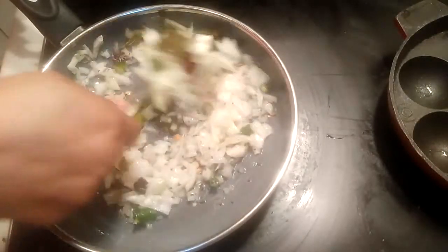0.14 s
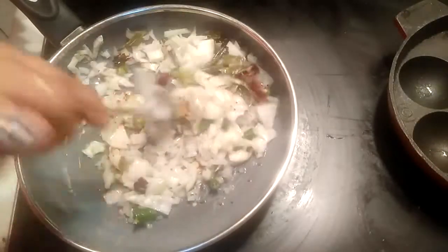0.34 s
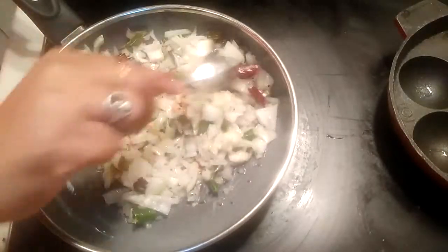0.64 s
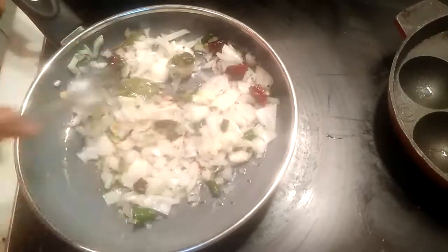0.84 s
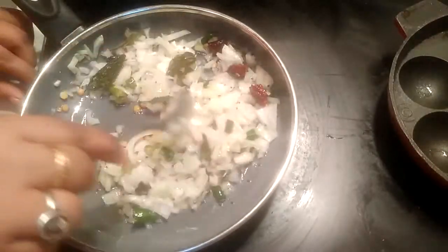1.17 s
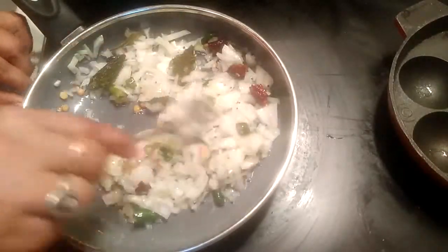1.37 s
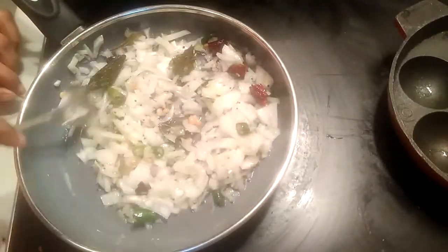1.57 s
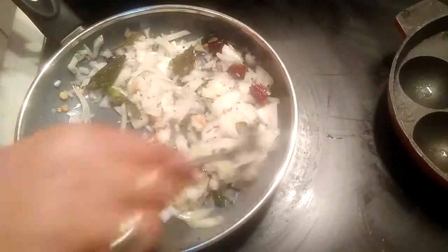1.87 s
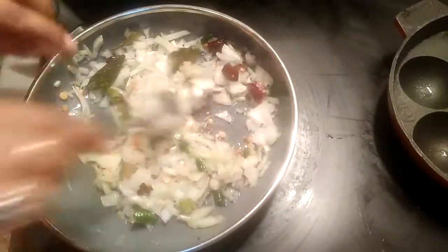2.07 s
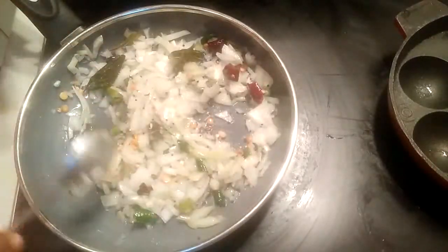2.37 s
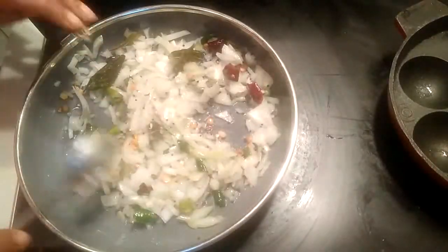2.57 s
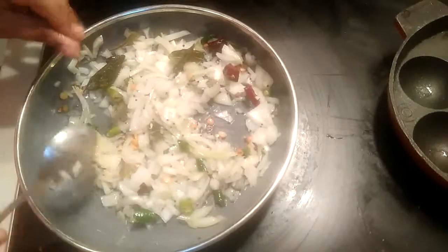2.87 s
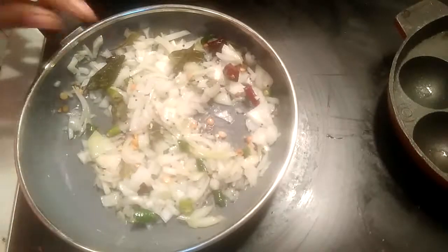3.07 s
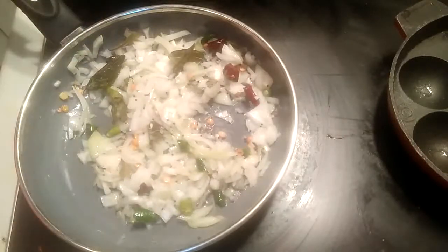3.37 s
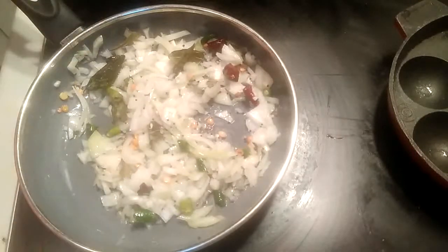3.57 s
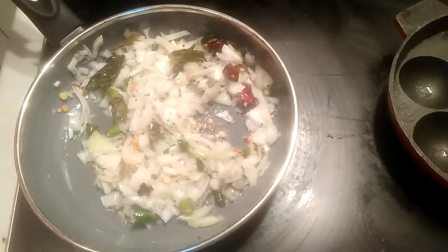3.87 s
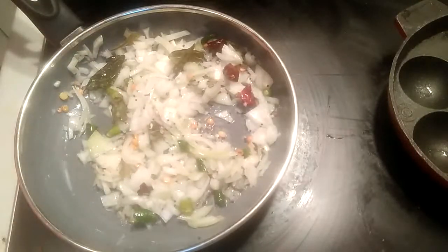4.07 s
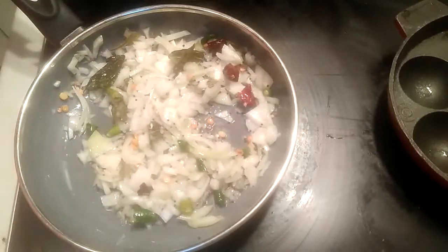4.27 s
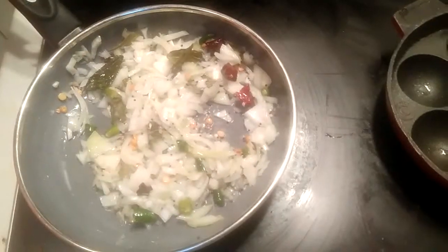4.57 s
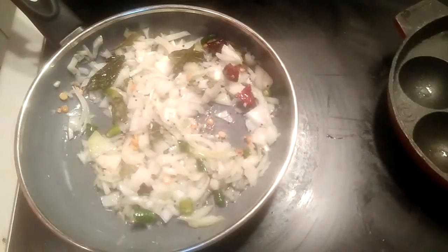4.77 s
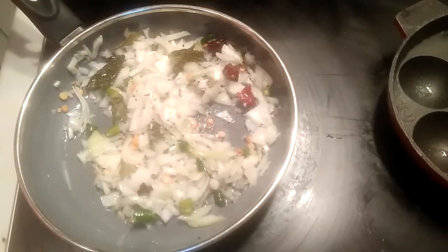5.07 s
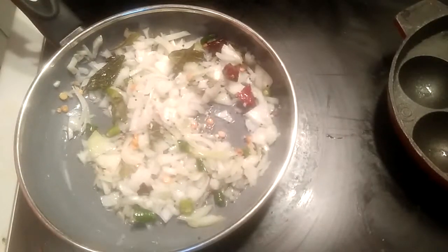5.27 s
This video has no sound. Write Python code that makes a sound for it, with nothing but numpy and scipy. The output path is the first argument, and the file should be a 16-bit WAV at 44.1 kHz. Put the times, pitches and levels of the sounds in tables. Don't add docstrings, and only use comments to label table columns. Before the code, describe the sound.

A bright scrape with a short squeak opens, then scattered metallic clacks of a stirring spoon over gentle frying. Past the middle come quick rim taps with little bounces, then a hollow set-down and loud clattering landing. The sizzle continues with spits, light ticks and wavering faint whines. Small kitchen, low electrical hum, close handheld phone sound with suppressed background.

```python
import sys
import numpy as np
from scipy import signal
from scipy.fft import rfft, irfft, next_fast_len
from scipy.io import wavfile
from scipy.ndimage import uniform_filter1d, map_coordinates

SR = 44100
rng = np.random.default_rng(int(sys.argv[2]) if len(sys.argv) > 2 else 0)


def level_to_linear(level):
    exponent = np.asarray(level, float) / 20
    return 10 ** exponent


def waveform_to_disk(signal):
    frames = np.transpose(np.atleast_2d(signal))
    scaled = np.clip(frames, -1, 1) * 32767
    samples = np.round(scaled).astype(np.int16)
    wavfile.write(sys.argv[1], SR, samples)


N = 238757


def unit(x):
    return x / np.sqrt(np.mean(x ** 2) + 1e-20)


def curves(rows, off_db=None):
    s, *columns = np.transpose(rows)
    t = np.arange(N) / SR
    return [np.interp(t, s, column, left=off_db, right=off_db) for column in columns]


def wobble(rate, size=N):
    knots = rng.standard_normal(int(size * rate / SR) + 4)
    return map_coordinates(knots, [np.arange(size) * rate / SR])


def gain(points, hz):
    f, level = np.transpose(points)
    return level_to_linear(np.interp(np.log(hz + 1), np.log(f + 1), level, left=-120, right=-120))


def bell(hz, centre_hz, octaves):
    return np.exp(-.5 * (np.log2((hz + 1) / centre_hz) / octaves) ** 2)


def filtered(x, response):
    m = next_fast_len(x.shape[-1] + 4096)
    return irfft(rfft(x, m) * response(np.fft.rfftfreq(m, 1 / SR)), m)[..., :x.shape[-1]]


def burst(size, response):
    return unit(filtered(rng.standard_normal(size), response))


def hiss(spectrum, patchy_db, source=None, size=4):
    source = rng.standard_normal(N) if source is None else source
    z = signal.stft(source, nperseg=512)[2]
    field = uniform_filter1d(rng.standard_normal(z.shape), size=size, axis=0)
    field = uniform_filter1d(field, size=9, axis=1)
    patchy = signal.istft(z * level_to_linear(patchy_db * unit(field)), nperseg=512)[1][:N]
    return unit(filtered(patchy, lambda hz: gain(spectrum, hz)))


def crackle(count, spread_db, life_s, share):
    sizes = np.bincount(rng.integers(0, N, count), level_to_linear(spread_db * rng.exponential(size=count)), N)
    puffs = signal.lfilter([1], [1, -np.exp(-1 / (life_s * SR))], sizes)
    return (unit(puffs) * share + 1) * rng.standard_normal(N)


def ring(modes, t, scatter_db, beat=.45):
    out = 0
    for hz, db, t60 in modes:
        a, b, c = rng.standard_normal(3)
        beating = 1 + beat * np.sin(2 * np.pi * (9 + hz / 400) * t + 3 * c)
        out = out + level_to_linear(db + scatter_db * a - 60 * t / t60) * np.sin(2 * np.pi * hz * t + 3 * b) * beating
    return out


def place(out, s, sound):
    room = out[round(s * SR):][:len(sound)]
    room += sound[:len(room)]


# (time [s], strength [dB], brightness [dB])
SIZZLE = [(0.0, -27.5, -16.5), (0.04, -33.5, -14.5), (0.21, -42, -12.5), (0.5, -42.5, -14.5),
          (0.83, -39, -11.5), (0.93, -40.5, -11.5), (1.08, -44.5, -13), (1.22, -46.5, -11.5),
          (2.71, -43, -11.5), (2.86, -42, -14), (3.25, -43, -11), (4.11, -42.5, -12.5), (4.29, -38, -17.5),
          (4.52, -39, -16), (5.02, -41, -12.5), (5.41, -39, -16.5)]
# (frequency [Hz], density [dB per Hz])
FRY = [(900, -51), (1250, -34), (1400, -18), (1470, -3), (1630, -3.5), (1695, 3), (1770, -8.5),
       (1900, -1.5), (2200, 0), (2830, 1), (3420, -1.5), (4000, -9.5), (4400, -22.5), (6000, -68)]
# (frequency [Hz], density [dB per Hz])
FIZZ = [(2530, -16), (4300, 0), (4910, -4), (5490, -2.5), (7660, -7), (11700, -3.5), (15200, -12),
        (16200, -25)]
# (frequency [Hz], density [dB per Hz])
MURMUR = [(110, -2), (190, 0), (298, -17), (365, -14.5), (488, -14.5), (592, -15.5), (1160, -11.5),
          (1400, -2), (1820, -31), (3080, -120)]


def frying():
    fry_db, bright_db = curves(SIZZLE)
    surge = wobble(14)
    boil = crackle(count=4000, spread_db=4.0, life_s=0.0017, share=0.24)
    fry = level_to_linear(fry_db + 0.13 * surge) * hiss(FRY, 1.55, boil)
    sparkle = crackle(count=2000, spread_db=4.5, life_s=0.00049, share=0.22)
    fizz = level_to_linear(fry_db + bright_db + .5 * surge) * hiss(FIZZ, 2.2, sparkle, size=16)
    murmur_db = -62.5 + 1.26 * (fry_db - fry_db.mean())
    opening = level_to_linear(murmur_db) + level_to_linear(-35) * aftermath(t60=0.5)
    return fry + fizz + opening * hiss(MURMUR, 4.2)


# (time [s], peak [dB], centre [Hz])
SPITS = [(.2072, -48, 12000), (.4033, -42, 5310), (.4432, -48, 11500), (1.3975, -37, 12200),
         (1.5277, -45, 11500), (2.046, -38.5, 5650), (2.3077, -29, 8800), (2.5197, -38, 5590),
         (2.6371, -36, 11200), (2.707, -37, 6670), (2.935, -43, 5500), (3.464, -32, 6420),
         (3.6109, -34, 6450), (3.646, -27, 5000), (3.654, -27, 4300), (3.8644, -47, 10680),
         (3.937, -33, 9300), (3.9771, -46, 11800), (4.1396, -35, 10100), (4.256, -40, 7190),
         (4.3247, -31, 8150), (4.6022, -33, 5240), (4.717, -30.5, 6030), (5.2106, -34, 5630),
         (5.37, -32.5, 7340)]


def spits():
    out, t = np.zeros(N), np.arange(round(.02 * SR)) / SR
    for s, db, hz in SPITS:
        puff = burst(len(t), lambda f: bell(f, hz, octaves=0.24))
        place(out, s, level_to_linear(db - 8.5 - 60 * t / 0.012) * puff)
    return out


# (time [s], peak [dB], centre [Hz], tick [dB])
TOUCHES = [(0.023, -23, 2500, -25), (.046, -24, 2400, -31), (0.16, -24, 2050, -25), (0.202, -33, 2900, -20),
           (0.209, -25.5, 2500, -23), (1.3165, -33, 2800, -32), (1.529, -24.5, 2700, -23),
           (1.547, -23.5, 3420, -26), (1.9737, -31, 2650, -30), (2.041, -22.5, 2700, -25),
           (2.3068, -26.5, 2900, -20), (2.934, -31, 3020, -17), (3.955, -25, 3470, -30),
           (4.1872, -22, 2830, -27), (4.6027, -23.5, 3170, -27), (4.6273, -25, 2150, -29),
           (5.2107, -27, 3110, -10.5)]
# (time [s], peak [dB], centre [Hz], thud [dB])
TAPS = [
    (2.6559, -15.5, 1663, -21.5),
    (2.666, -20.5, 2200, -29),
    (2.8053, -5, 1625, -22),
    (2.8175, -12.5, 2200, -30),
    (2.8587, -23.5, 2360, -13),
    (2.988, -9, 1630, -18),
    (2.998, -18, 2200, -25),
    (3.0125, -25, 2340, -29),
]
# (time [s], peak [dB], centre [Hz], hollow body [dB], tick [dB])
BLOWS = [
    (0.4355, -25.5, 1870, -35, -25),
    (0.6095, -20.5, 2560, -28, -33),
    (0.9765, -6.5, 2460, -20.5, -23),
    (1.664, -10.5, 1780, -29, -27.5),
    (2.459, -24.5, 2000, -30, -38),
    (2.497, -37, 3000, -47, -27),
    (3.5415, -14.5, 2000, -11, -45),
    (3.6457, -8, 3070, -12.5, -13.5),
    (3.6534, -4.5, 2400, -20, -18),
]


def contacts():
    touches = [(s, db, hz, -49, -55, tick) for s, db, hz, tick in TOUCHES]
    taps = [(s, db, hz, thud, -32.5, -30.5) for s, db, hz, thud in TAPS]
    blows = [(s, db, hz, -2 + 1.345 * body, body, tick) for s, db, hz, body, tick in BLOWS]
    return touches + taps + blows


# (frequency [Hz], density [dB per Hz])
BLOW = [(950, -11), (1250, -8), (1400, -9.5), (1650, -1), (1900, -9.5), (2420, -4), (3000, -3),
        (3630, -4.5), (4620, -19), (5600, -38)]
# (frequency [Hz], density [dB per Hz])
THUD = [(60, -8), (110, -6), (240, -9.5), (410, -5), (560, -12.5), (680, -19.5), (800, -62)]
# (frequency [Hz], level [dB], t60 [s])
PAN = [(484, -18, .2), (1420, -12, .12), (1692, -4, .25), (1970, -10, .2), (2126, -6, .16), (2272, -5, .13),
       (2417, 0, .21), (2805, -4, .22), (2977, -9, .2), (3560, -18, .15)]
# (frequency [Hz], level [dB], t60 [s])
RIM = [(393, -8, .06), (1098, -14, .2), (1432, -9, .15), (1610, -2, .11), (1690, -6, .15), (1879, -13, .25),
       (1965, -5, .09), (2105, -1, .15), (2347, -7, .25), (2498, -11, .25), (3112, -14, .16)]
RIM_FROM_S, OFF_PAN_S = 2.6, 3.6


def knock(t, s, db, hz, thud_db, body_db, tick_db):
    on_floor, on_rim, on_pan = s < RIM_FROM_S, RIM_FROM_S < s < OFF_PAN_S, s < OFF_PAN_S
    rise, crack = 1 - np.exp(-t / 0.0002), level_to_linear(-60 * t / 0.006)
    contact = 1 / (0.5 + (t / (0.0088 + db / 7000)) ** 4)
    note = np.sin(2 * np.pi * hz * t)

    clack = contact * burst(len(t), lambda f: gain(BLOW, f) * bell(f, hz, 0.59))
    clack = clack + contact * (2.2 if on_rim else .25) * note
    clack = clack + level_to_linear(9.5 - db / 6 + (9 if on_floor else -8)) * crack * note
    clack = filtered(rise * clack, lambda f: 1 / (1 + (1150 / (f + 1)) ** 8))

    tail_db = 0 if on_rim else -0.5 if on_floor else -1
    tail = burst(len(t), lambda f: gain(BLOW, f)) * level_to_linear(tail_db - 60 * t / 0.25)
    if on_pan:
        tail = tail + level_to_linear(-0.5 if on_rim else -2) * ring(RIM if on_rim else PAN, t, 1.6, beat=0.37)
    tail = 1.29 * filtered(tail, lambda f: bell(f, 0.93 * hz, 0.63))

    thud_t60 = .26 if on_rim else .3
    thud = burst(len(t), lambda f: gain(THUD, f)) * level_to_linear(thud_db + 4.0 - 60 * t / thud_t60)
    hollow = burst(len(t), lambda f: bell(f, 1014, 0.23))
    body = hollow * level_to_linear(body_db - 2.0) * (contact + level_to_linear(-5.0 - 60 * t / 0.39))
    answer = burst(len(t), lambda f: bell(f, 830, 0.74)) * level_to_linear(2 * body_db + 10.5 - 60 * t / 0.34)
    tick_fade = level_to_linear(9.0 - 60 * t / 0.014) + level_to_linear((-7.5 if on_pan else -15) - 60 * t / 0.32)
    tick = burst(len(t), lambda f: gain(FIZZ, f)) * level_to_linear(tick_db) * tick_fade

    strength_db = db / 6 - 8.5
    after = level_to_linear(strength_db) * tail + thud + body + answer + tick
    return level_to_linear(db) * (level_to_linear(-2.5) * clack / np.abs(clack).max() + level_to_linear(-6) * rise * after)


def knocks():
    out, t = np.zeros(N), np.arange(round(.4 * SR)) / SR
    for s, *contact in contacts():
        place(out, s, knock(t, s, *contact))
    return out


# (frequency [Hz], level [dB], t60 [s])
PLATE = [(261, -16, .4), (339, -11, .7), (864, -8, .15), (1032, -4.5, .32), (1378, -17, .3),
         (1619, -7, .42), (1888, -14, .3), (2182, -6, .2), (2546, -6, .2), (2686, -13, .25),
         (2820, -7, .25), (3282, -5, .31), (3429, -11, .14)]
# (frequency [Hz], level [dB], t60 [s])
SPOON = [(3628, -14, .24), (4167, -16, .42), (4377, -14, .085), (6444, -21, .14), (8204, -20, .3),
         (9276, -15, .25), (9855, -16, .3), (10550, -18, .25), (11049, -18, .5), (13794, -11, .17)]


def spoon_drop():
    out, t = np.zeros(N), np.arange(round(.6 * SR)) / SR
    land_s, land_db = 3.654, -19.5
    fade = (1 - np.exp(-t / 0.001)) / (1 + (t / .15) ** 4)
    place(out, land_s, level_to_linear(land_db) * ring(PLATE, t, 0, beat=0.2) * fade)
    place(out, land_s - .006, level_to_linear(land_db) * ring(SPOON, t, 0, beat=.75) * fade)
    return out


# (time [s], peak [dB], frequency [Hz], t60 [s])
CLICKS = [(.2028, -25, 2800, 0.0025), (1.164, -34, 2800, .004), (4.6018, -27, 3200, .005),
          (0.9762, -2.5, 2220, 0.0025), (1.3165, -33, 2700, .006), (1.5483, -30, 3360, .006),
          (1.9737, -34, 2600, 0.0041), (2.4599, -19.5, 2230, .005), (2.498, -24.5, 2900, 0.0033),
          (2.682, -30, 2080, 0.024), (2.693, -32.5, 2430, 0.033), (3.544, -13.5, 2230, 0.023),
          (2.9882, -13, 1653, 0.025), (.6095, -26.5, 2580, 0.0045), (3.6485, -7, 2360, .008),
          (4.187, -24.5, 2830, 0.0085)]
# (time [s], peak [dB], frequency [Hz], half length [s])
THUMPS = [
    (3.55, -29, 115, .009),
    (3.659, -25, 138, .011),
    (2.808, -27, 380, .002),
    (2.816, -33, 450, .003),
    (2.878, -31, 440, .003),
    (2.99, -27, 360, .002),
    (2.998, -31, 450, .003),
]


def clicks():
    out, t = np.zeros(N), np.arange(N) / SR
    for s, db, hz, half in THUMPS:
        out += level_to_linear(db) * np.exp(-.5 * ((t - s) / half) ** 2) * np.sin(2 * np.pi * hz * (t - s))
    near = t[:round(.04 * SR)]
    for s, db, hz, t60 in CLICKS:
        click = (1 - np.exp(-near / .0003)) * level_to_linear(-60 * near / t60) * np.sin(2 * np.pi * hz * near)
        place(out, s, level_to_linear(db) * click / np.abs(click).max())
    return out


# (time [s], pitch [Hz], level [dB])
SQUEAK = [
    (0.035, 650, -66),
    (0.046, 578, -46),
    (0.058, 569, -38.5),
    (0.136, 499, -54),
    (0.15, 470, -49),
    (0.165, 460, -79),
]
# (time [s], bright part [dB], dull part [dB])
SCRAPE = [(0.0, -9, -39), (0.004, -26, -54), (0.016, -28, -52), (0.025, -22.5, -49), (0.038, -30.5, -51),
          (0.06, -29.5, -48), (0.1, -30, -49), (0.125, -33, -53), (0.156, -42.5, -54), (0.218, -43, -81),
          (0.26, -49, -79)]
# (frequency [Hz], width [Hz], level [dB])
SCRAPED = [(1313, 73, -5.5), (2150, 52, 5), (2360, 184, 0), (2796, 130, -2), (3110, 60, -17),
           (3420, 57, -3), (3600, 59, -5.5), (3760, 20, -1.5), (4340, 80, -19), (5300, 870, -25.5)]
# (frequency [Hz], level [dB], t60 [s])
RUNG = [(1351, -12, .3), (2130, -4, .4), (2315, -2, .35), (2450, -1, .2), (2830, -2, .3), (3343, -8, .29),
        (3620, -5, .2)]


def scraped_steel(f):
    steel = 0
    for k, (centre, width, db) in enumerate(SCRAPED):
        steel = steel + (-1) ** k * level_to_linear(db) * 1j * f * width / (centre ** 2 - f * f + 1j * f * width)
    return steel / (1 + (1200 / (f + 1)) ** 12)


def scraping():
    bright_db, dull_db = curves(SCRAPE, -120)
    grit = crackle(count=3000, spread_db=3.5, life_s=0.0033, share=0.77)
    chatter = unit(filtered(grit, scraped_steel))
    dull = hiss([(600, -15), (680, 0), (900, -4), (1000, -32)], 1.4)
    squeak_hz, squeak_db = curves(SQUEAK)[0], curves(SQUEAK, -120)[1]
    squeak = np.sqrt(2) * np.sin(2 * np.pi * np.cumsum(squeak_hz) / SR)
    rung = level_to_linear(-32) * ring(RUNG, np.arange(N) / SR, 1, beat=.4)
    return rung + level_to_linear(bright_db) * chatter + level_to_linear(dull_db) * dull + level_to_linear(squeak_db) * squeak


# (time [s], level [dB])
HUM = [(0.0, -39.5), (0.07, -39), (0.29, -43), (0.53, -37.5), (0.71, -42.5), (0.93, -36.5), (1.08, -43),
       (1.78, -44), (1.9, -39), (2.23, -43), (2.3, -39), (2.74, -42.5), (2.8, -35.5), (3.15, -40.5),
       (3.33, -37.5), (4.08, -40), (5.35, -36), (5.41, -39)]
# (time [s], level [dB])
MOTOR = [(0.0, -83), (0.09, -57), (0.32, -61), (0.74, -48), (1.11, -67), (1.45, -62), (1.66, -56),
         (2.29, -63), (3.06, -43.5), (3.19, -62), (3.51, -58), (4.17, -61), (4.35, -55.5), (5.41, -57)]
# (frequency [Hz], density [dB per Hz])
DRONE = [(20, -36), (30, -7), (49, -8), (70, -10), (88, -2), (96, -40)]
# (frequency [Hz], density [dB per Hz])
RUMBLE = [(66, -55), (112, -31), (124, 2.5), (151, 3.5), (230, -28.5), (300, -65), (510, -120)]
# (frequency [Hz], density [dB per Hz])
BOOM = [(150, -28), (200, 2), (330, -4), (450, -12), (620, -23)]


def kitchen():
    t = np.arange(N) / SR
    (hum_db,), (motor_db,) = curves(HUM), curves(MOTOR)
    hum_hz = 99.7 + 0.43 * wobble(6.15)
    hum_db = hum_db + 1.9 * wobble(8) + 0.74 * wobble(27)
    hum = level_to_linear(hum_db) * np.sqrt(2) * np.sin(2 * np.pi * np.cumsum(hum_hz) / SR)
    motor = np.sqrt(2) * np.sin(2 * np.pi * 49 * t + 0.74 * wobble(5.3)) + hiss(DRONE, 2.0)
    rumble = level_to_linear(-56.5 + 0.36 * relaxed_db() + 3.1 * wobble(4.01)) + level_to_linear(-45) * aftermath(t60=0.61)
    boom = level_to_linear(-72.5 + relaxed_db()) * hiss(BOOM, 4.3)
    return hum + level_to_linear(motor_db - 0.5) * motor + rumble * hiss(RUMBLE, 2.4) + boom


# (frequency [Hz], start [s], end [s], level [dB])
WHINES = [(293, .727, 1, -50), (293, 0.98, 1.19, -55.5), (594, 0.605, .748, -63),
          (1310, 1.27, 1.426, -60.5), (1030, 2.48, 2.74, -69), (785, 2.93, 3.21, -60.5),
          (785, 3.19, 3.48, -63), (586, 3.13, 3.26, -68), (293, 3.04, 3.5, -50.5), (148, 2.6, 3.55, -60),
          (1445, 4, 4.17, -55), (293.2, 4.25, 4.6, -68.5), (1123, 4.905, 5.06, -48.5),
          (1108, 5.03, 5.14, -55), (1118, 5.11, 5.195, -53), (1117, 5.175, 5.295, -51),
          (1118, 5.28, 5.42, -50), (1340, 4.91, 5.12, -57.5), (414, 4.98, 5.1, -68), (410, 5.24, 5.45, -62),
          (780, 4.2, 4.34, -66), (1340, 4.36, 4.47, -56), (1680, 3.1, 3.2, -70)]


def whines():
    out, t = np.zeros(N), np.arange(N) / SR
    for hz, start, end, db in WHINES:
        now = t[round(start * SR):round(end * SR)]
        gate = np.clip(np.minimum(now - start, end - now) / 0.028, 0, 1)
        level = level_to_linear(db + 2.5 * wobble(45, len(now)))
        jitter = .45 * wobble(70, len(now)) + .3 * wobble(14, len(now))
        place(out, start, gate * level * np.sqrt(2) * np.sin(2 * np.pi * hz * now + jitter))
    return out


# (time [s], length [s], centre [Hz], width [octaves], level [dB])
LEAKS = [(0.441, 0.03, 1070, 0.1, -56), (0.558, 0.046, 468, 0.14, -59.5), (0.633, 0.028, 980, 0.11, -58),
         (0.782, .04, 1170, .1, -64), (1.385, 0.026, 423, 0.19, -69), (1.533, 0.024, 1170, 0.23, -57),
         (1.783, 0.09, 287, 0.14, -62.5), (2.145, 0.049, 1100, 0.18, -60.5),
         (2.475, 0.022, 910, 0.23, -53.5), (2.878, 0.0083, 450, 0.45, -40),
         (4.087, 0.034, 500, 0.11, -62.5), (4.681, 0.062, 195, 0.36, -53), (4.666, .04, 1010, 0.1, -61),
         (4.828, 0.086, 1080, 0.12, -60.5), (5.2, 0.033, 261, .3, -61)]


def leaks():
    out, t = np.zeros(N), np.arange(round(.3 * SR)) / SR
    for s, length, hz, octaves, db in LEAKS:
        puff = np.exp(-.5 * ((t - .15) / (length / 2)) ** 2)
        band = filtered(rng.standard_normal(len(t)), lambda f: bell(f, hz, octaves))
        loudness = np.sqrt(np.average(band ** 2, weights=puff))
        place(out, s - .15, level_to_linear(db) * puff * band / loudness)
    return out


def aftermath(t60):
    t, power = np.arange(N) / SR, 0
    for s, db, *_ in contacts():
        power = power + (t > s) * level_to_linear(1.42 * db - 60 * np.abs(t - s) / t60) ** 2
    return np.sqrt(power)


# (start [s], end [s], extra level [dB])
RELAXED = [
    (0.66, 1.304, 11.5),
    (3.016, 3.515, 14.5),
    (3.73, 3.904, 19.5),
    (5.048, 5.5, 8),
]


def relaxed_db():
    t = np.arange(N) / SR
    return sum(db * np.clip(np.minimum(t - start, end - t) / 0.021, 0, 1) for start, end, db in RELAXED)


def scene():
    spoon = scraping() + knocks() + spoon_drop() + clicks()
    background = kitchen() + whines() + leaks()
    return np.tile(frying() + spits() + spoon + background, (2, 1))


def roll_off(x):
    return signal.sosfilt(signal.butter(12, 16340, fs=SR, output="sos"), x)


# (time [s], treble [dB], top [dB])
SPREAD = [
    (0, -50, -50),
    (2.5, -50, -45),
    (2.65, -19, -17),
    (2.95, -26, -16),
    (3.6, -28, -16),
    (3.75, -19, -17),
    (5.41, -20, -17),
]


def record(dry):
    treble_db, top_db = curves(SPREAD)
    treble = filtered(dry[0], lambda hz: hz > 4200)
    loudness = np.sqrt(np.abs(uniform_filter1d(treble ** 2, size=900)))
    knocked = (loudness > 2.5 * np.median(loudness)) & (np.arange(N) > SR // 2)
    low = hiss([(3600, -37), (4400, -3), (8000, 2), (12800, -6), (13200, -40)], 2.0)
    top = hiss([(12700, -40), (13200, 5), (15700, -5), (16000, -40)], 2)
    low = level_to_linear(np.where(knocked, -19, treble_db)) * low
    top = level_to_linear(np.where(knocked, -19, top_db) - 2) * top
    side = loudness * (low + top)
    mix = filtered(dry + [side, -side], lambda hz: hz < 16300)
    return roll_off(mix)


dry = scene()
out = record(dry)
waveform_to_disk(out)
```